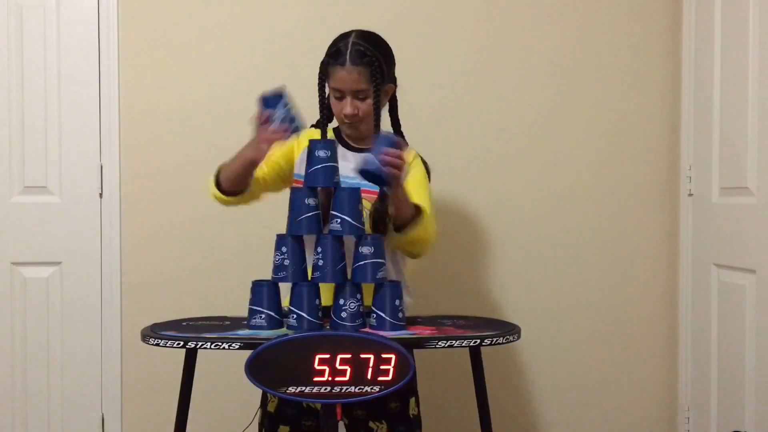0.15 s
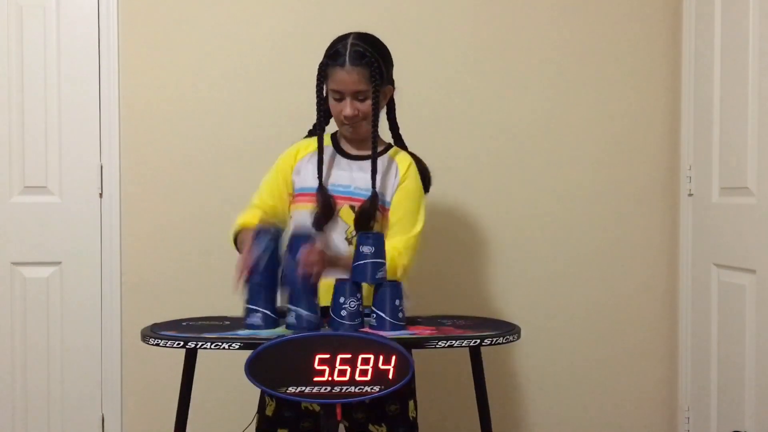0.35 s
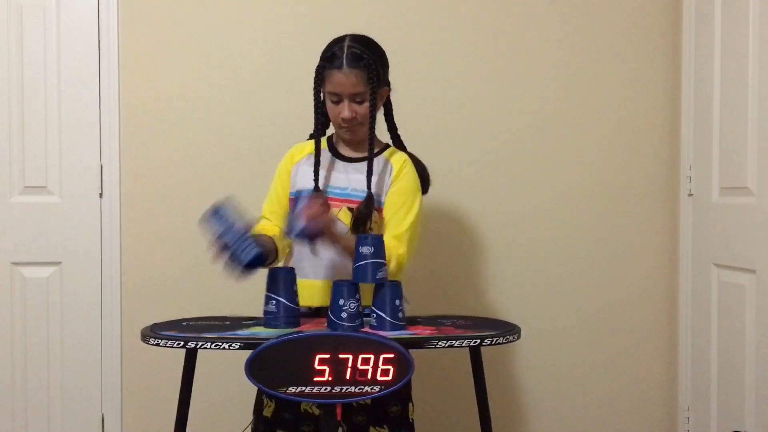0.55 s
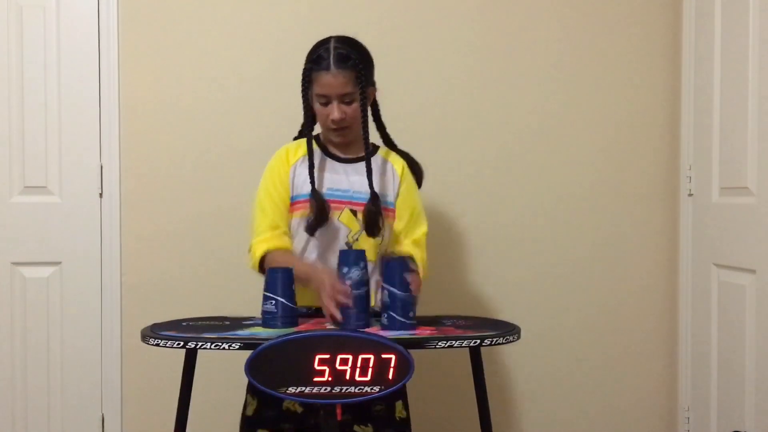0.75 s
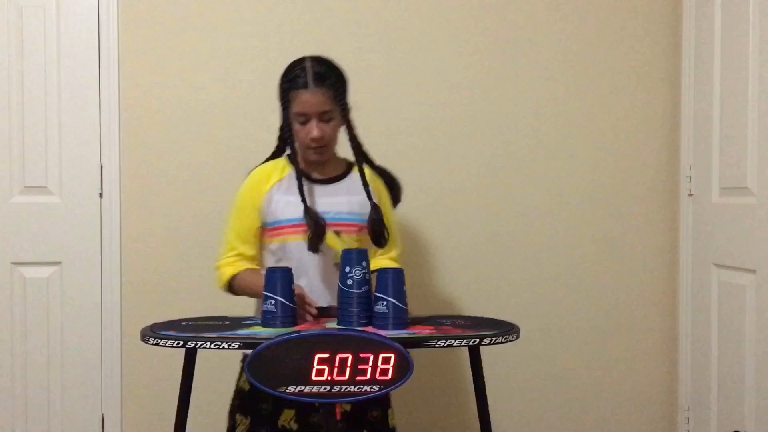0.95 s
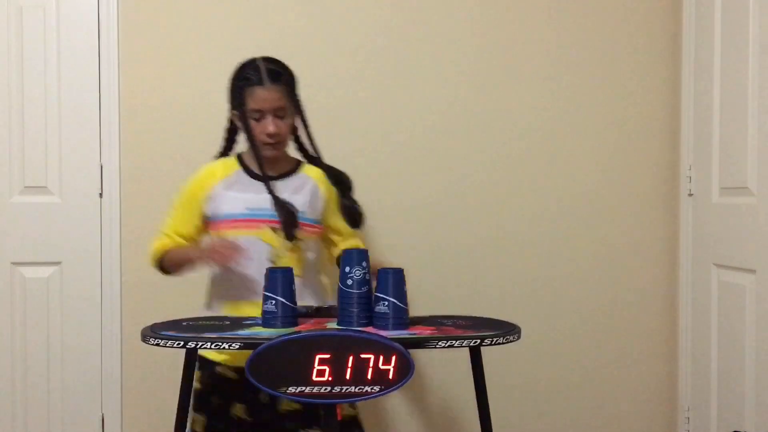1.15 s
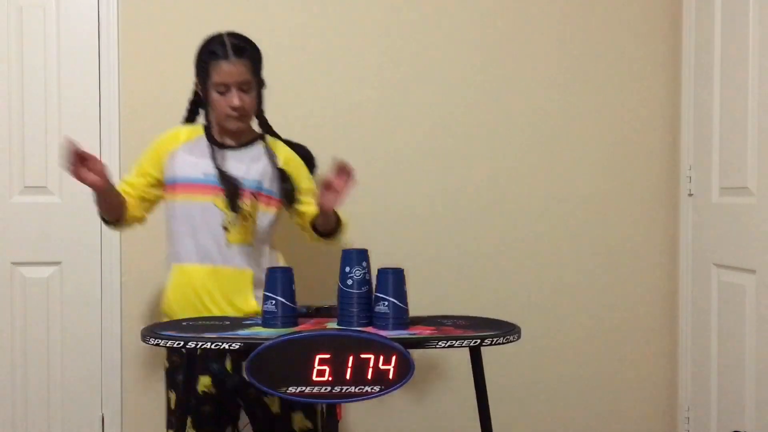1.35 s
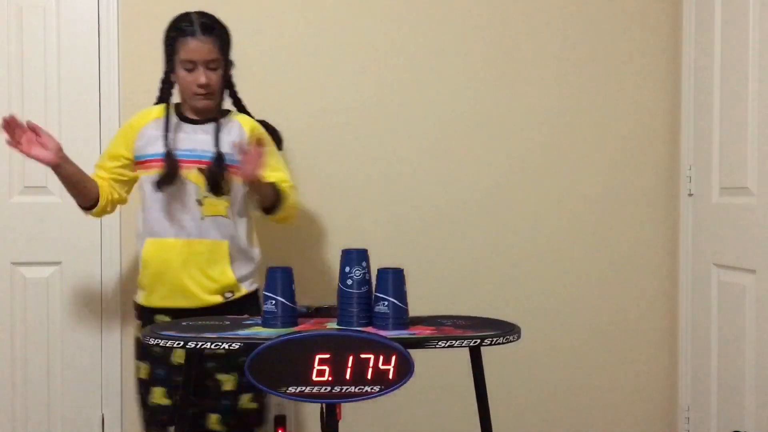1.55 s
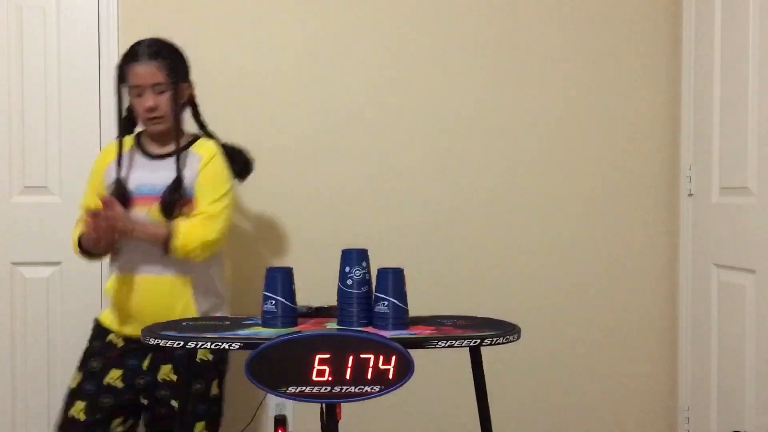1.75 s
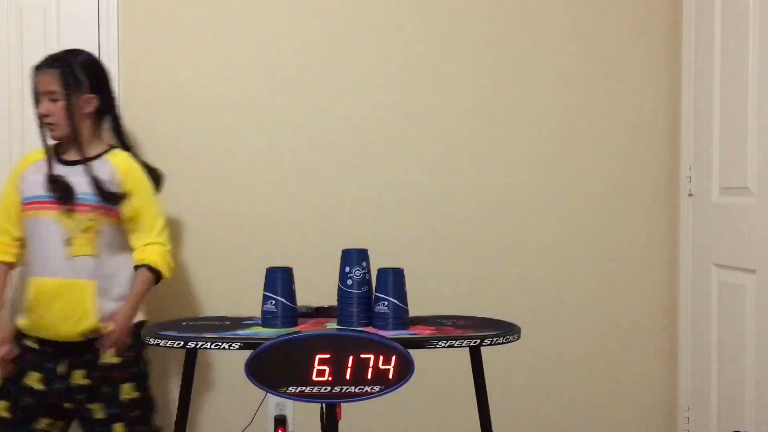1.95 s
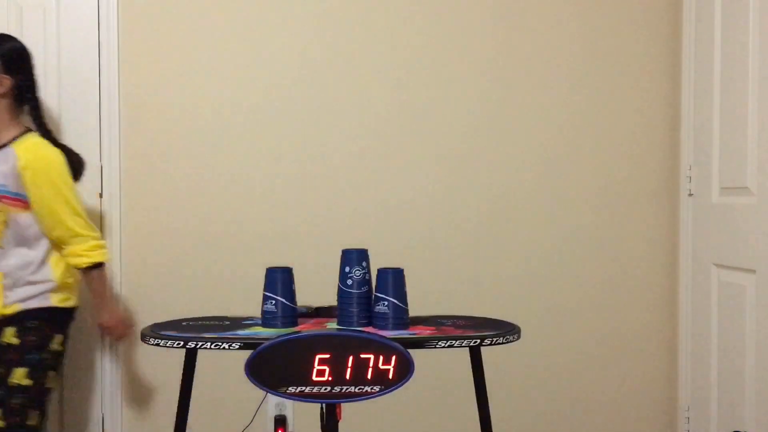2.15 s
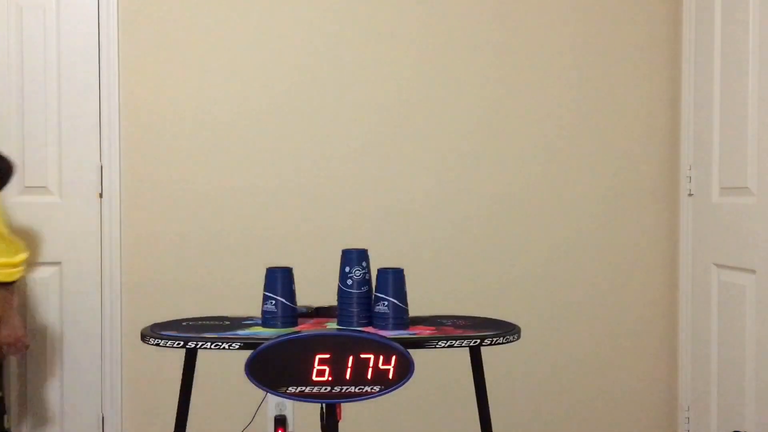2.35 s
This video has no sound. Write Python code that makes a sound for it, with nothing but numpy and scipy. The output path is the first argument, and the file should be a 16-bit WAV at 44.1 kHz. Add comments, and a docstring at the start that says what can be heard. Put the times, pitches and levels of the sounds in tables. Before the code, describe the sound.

Rapid hollow clatter of plastic cups being nested on a table, followed by a single clap.

```python
"""A bare, echoing room: plastic stacking cups are swept into nested piles on a small table.
An earlier flurry is still dying away as two fast flurries follow. Each contact is a rim click,
a hollow cup knock and a table thud; nesting cups scrape and pop, and full piles boom on the table.
Afterwards clothes rustle and the hands clap once; faint ticks sit in the room's hush."""
import sys
import numpy as np
from scipy import signal
from scipy.fft import rfft, irfft
from scipy.io import wavfile

SR = 44100
rng = np.random.default_rng(int(sys.argv[2]) if len(sys.argv) > 2 else 0)


def generate_wav(sig):
    """Save sig (samples, or channels by samples) to the path in sys.argv[1] as 16-bit PCM at SR."""
    pcm = np.round(np.clip(np.atleast_2d(sig).T, -1, 1) * 32767).astype(np.int16)
    wavfile.write(sys.argv[1], SR, pcm)


N = 105840


def amp(db):
    """dB to gain."""
    return 10 ** (np.asarray(db) / 20)


def along(points, hz):
    """Interpolate a table on a log frequency axis."""
    freqs, values = np.transpose(points)
    return np.interp(np.log(hz + 1), np.log(freqs + 1), values)


def fade(t, t60):
    """Exponential decay, 60 dB per t60."""
    return np.exp(-np.log(1000) * t / t60)


def norm(x):
    """Scale to unit energy."""
    return x / np.sqrt(np.sum(x ** 2) + 1e-20)


def add(out, start_s, db, x, window_s=0.01):
    """Mix in x; db is the level of unit energy spread over window_s."""
    i = int(round(start_s * SR))
    x = x[:N - i]
    out[i:i + len(x)] += amp(db) * np.sqrt(window_s * SR) * x


def colour(spectrum, size=2048):
    """Minimum-phase impulse response of a spectrum, unit energy."""
    gain = amp(along(spectrum, np.fft.rfftfreq(size, 1 / SR)))
    cepstrum = irfft(np.log(gain))
    cepstrum[1:size // 2] *= 2
    cepstrum[size // 2 + 1:] = 0
    return norm(irfft(np.exp(rfft(cepstrum))))


def noise(spectrum):
    """Coloured noise, unit rms."""
    return norm(signal.fftconvolve(rng.standard_normal(N), colour(spectrum))[:N]) * np.sqrt(N)


def lowpass(x, cutoff_hz, order=60):
    """Steep zero-phase low-pass."""
    hz = np.fft.rfftfreq(2 * N, 1 / SR)
    return irfft(rfft(x, 2 * N) / (1 + (hz / cutoff_hz) ** (2 * order)))[:N]


def ring(modes, attack_s=0.0022):
    """Struck modes as decaying sines, unit energy."""
    t = np.arange(SR) / SR
    sines = sum(amp(db) * np.sin(2 * np.pi * hz * t) * fade(t, t60) for hz, db, t60 in modes)
    return norm(sines * (1 - np.exp(-t / attack_s)))


# Room decay (frequency [Hz], T60 [s])
ROOM_DECAY = [(100, 0.61), (350, 0.53), (1000, 0.47), (2700, 0.59), (5500, 0.53), (8000, 0.41),
              (12000, 0.37)]

def room_tail(decay=ROOM_DECAY, wall_s=0.0019):
    """Diffuse tail building up off the walls; T60 varies with frequency."""
    hz, t, bands = signal.stft(rng.standard_normal(SR), SR, nperseg=256)
    bands = bands * fade(t, along(decay, hz)[:, None])
    tail = signal.istft(bands, SR, nperseg=256)[1][:SR]
    onset = np.clip(np.arange(SR) / SR / wall_s - 0.5, 0, 1)
    return norm(tail * onset)


def blow(body, t60, wet_db, decay=ROOM_DECAY):
    """Contact noise burst plus room tail, filtered by the struck body."""
    out = signal.fftconvolve(amp(wet_db) * room_tail(decay), body)
    burst = rng.standard_normal(SR // 10) * fade(np.arange(SR // 10) / SR, t60)
    direct = norm(signal.fftconvolve(burst, body))
    out[:len(direct)] += direct
    return out


# Room noise and tick spectra (frequency [Hz], level [dB])
HUSH_SPECTRUM = [(15, -48), (25, -17.5), (49, 4), (142, -7.5), (224, -6.5), (515, -22.5), (588, -18.5),
                 (4870, -30.5), (6370, -28.5), (15000, -42.5)]
TICK_SPECTRUM = [(3000, -30), (5500, -20), (6500, 10), (7500, -10), (9500, 0), (11000, -25)]

def hush(ticks=6, first_s=2.101, gap_s=0.05):
    """Low room noise with a run of faint, even ticks."""
    out = amp(-65.5) * noise(HUSH_SPECTRUM)
    for k in range(ticks):
        add(out, first_s + k * gap_s, db=-74.5, x=colour(TICK_SPECTRUM))
    return out


# Sleeve spectrum (frequency [Hz], level [dB])
CLOTH_SPECTRUM = [(60, -10.5), (150, -17.5), (400, -12), (750, -8), (1450, -0.5), (2000, -9.5),
                  (2500, -16.5), (3500, -12), (7000, -25), (15000, -36)]
# Rustle envelope (time [s], level [dB])
CLOTH_ENVELOPE = [(1.575, -75), (1.603, -52.5), (1.65, -57.5), (1.69, -57.5), (1.75, -59), (1.85, -69)]

def cloth():
    """Sleeves rustle as the arms swing together."""
    times_s, levels_db = np.transpose(CLOTH_ENVELOPE)
    envelope_db = np.interp(np.arange(N) / SR, times_s, levels_db, left=-120, right=-120)
    return noise(CLOTH_SPECTRUM) * amp(envelope_db)


# Hollow ring spectrum (frequency [Hz], level [dB])
DYING_SPECTRUM = [(35, -40), (70, -19.5), (175, -7.5), (280, -19), (370, -6), (540, -14), (736, 0),
                  (900, -14.5), (1150, -16.5), (1400, -29.5), (1690, -28.5), (2100, -19.5), (2950, -30),
                  (3240, -22.5), (5000, -31), (11000, -47)]

def dying_flurry(start_db=-45.5, fall_db_per_s=44.5):
    """The ring of an earlier flurry fades out."""
    return noise(DYING_SPECTRUM) * amp(start_db - fall_db_per_s * np.arange(N) / SR)


# Swelled tail spectrum (frequency [Hz], level [dB])
SWELLED_TAIL_SPECTRUM = [(100, -20), (250, -14.5), (400, -4.5), (600, -0.5), (900, 1.5), (1200, 0),
                         (1550, -6), (2200, -0.5), (3500, -5), (5500, -12), (8000, -23)]

def swelled_tail(clatter, gain_db=-25.5, rise_s=0.14, cut_at_s=1.56):
    """The clatter's echo is held up as the recorder's gain recovers, then cuts off abruptly."""
    t = np.arange(N) / SR
    rise = 1 - np.exp(-t / rise_s)
    tail = norm(noise(SWELLED_TAIL_SPECTRUM) * fade(t, t60=1.36) * rise)
    cut = fade(np.maximum(t - cut_at_s, 0), t60=0.1)
    return amp(gain_db) * cut * signal.fftconvolve(clatter, tail)[:N]


# Palm and wall reflection spectra (frequency [Hz], level [dB])
PALM_SPECTRUM = [(30, -52), (200, -13.5), (500, -8.5), (1000, -4), (1600, -6.5), (2400, 1), (3000, -2),
                 (3900, 3.5), (5200, -8), (8000, -13.5), (10500, -20), (15000, -17.5)]
WALL_SPECTRUM = [(100, -18), (400, -13), (2000, -7.5), (2800, -16), (3300, 0), (4300, -3), (5100, -15.5),
                 (7500, -20.5), (11000, -35)]
# Clap tail decay (frequency [Hz], T60 [s])
CLAP_DECAY = [(150, 0.39), (1000, 0.24), (2800, .36), (4000, 0.33), (5200, 0.21), (8000, .35),
              (14000, 0.24)]

def clap(start_s=1.7632, level_db=-23, slap_delay_s=0.0042):
    """One sharp hand clap, its slap off the near wall and the room's bright ring."""
    out = np.zeros(N)
    palms = blow(colour(PALM_SPECTRUM), t60=0.0079, wet_db=3, decay=CLAP_DECAY)
    wall_ring = norm(noise(WALL_SPECTRUM) * fade(np.arange(N) / SR, t60=0.78))
    add(out, start_s, level_db, palms)
    add(out, start_s + slap_delay_s, level_db - 5.5, colour(WALL_SPECTRUM))
    add(out, start_s, level_db - 4.5, wall_ring)
    return out


# Nesting slides (start [s], end [s], relative level per catch [dB])
CUP_SLIDES = [(0.256, 0.326, -28.5), (.33, 0.443, -27.5), (0.695, 0.748, -28), (0.743, 0.826, -26.5)]
# Rib catch spectrum (frequency [Hz], level [dB])
RIB_SPECTRUM = [(150, -35.5), (700, -10.5), (1600, 0), (2200, 0.5), (3500, -1.5), (5500, -5), (8000, -7.5),
                (11000, -14.5)]

def scrape(catches_per_s=420, spread_db=2.5, wet_db=-4.5):
    """Ribs of sliding cups catch in a dense, uneven run of tiny clicks."""
    out, catch = np.zeros(N), colour(RIB_SPECTRUM)
    for start_s, end_s, db in CUP_SLIDES:
        for time_s in np.arange(start_s, end_s, 1 / catches_per_s):
            jitter, strength = rng.standard_normal(2)
            add(out, time_s + 0.5 * jitter / catches_per_s, db + spread_db * strength, catch)
    reverb = signal.fftconvolve(out, room_tail())[:N]
    return (out + amp(wet_db) * reverb) / (1 + amp(wet_db))


# Air pops (time [s], pitch [Hz], relative level [dB], T60 [s])
AIR_POPS = [(.243, 787, -16, 0.19), (.3155, 1101, -11, .14), (.3165, 521.5, -13.5, .2),
            (.36, 862, -16, 0.18), (.371, 781, -17, .22), (.7285, 1071, -9.5, 0.15),
            (.7305, 703.5, -10, 0.21), (.735, 1480, -15.5, 0.095), (.7725, 786, -15, 0.4),
            (.8088, 1150, -13.5, 0.47)]

def pops():
    """The air in a cup rings as it drops over another."""
    out = np.zeros(N)
    for time_s, hz, db, t60 in AIR_POPS:
        add(out, time_s, db, ring([(hz, 0, t60)]))
    return out


# Landings (time [s], relative boom [dB], ring pitch [Hz], relative ring [dB], ring T60 [s])
PILE_LANDINGS = [(0.351, -37, 375, -17, 0.29), (.44, -15, 236, -14, 0.66), (.7745, -13, 316.3, -6.5, 0.37),
                 (0.808, -15, 239.5, -14.5, 0.32)]
# Table boom spectrum (frequency [Hz], level [dB])
BOOM_SPECTRUM = [(20, -44), (50, -17.5), (80, -8), (125, -0.5), (175, -1), (260, -6), (500, -29.5),
                 (3000, -61)]

def landings():
    """Each full pile booms on the table top and rings at its own pitch."""
    out, boom = np.zeros(N), colour(BOOM_SPECTRUM, size=4096)
    for time_s, boom_db, hz, ring_db, t60 in PILE_LANDINGS:
        add(out, time_s, boom_db, blow(boom, t60=0.067, wet_db=-5))
        add(out, time_s, ring_db, ring([(hz, 0, t60)]))
    return out


# Contacts (time [s], relative click [dB], relative knock [dB], relative thud [dB])
CUP_CONTACTS = [(0.225, -25.5, -28.5, -26.5), (0.2331, -36, -31.5, -31), (.243, -25, -22, -33),
                (.249, -24.5, -22, -29.5), (0.2617, -26, -23.5, -25), (0.271, -26, -23, -24),
                (.2847, -25, -24.5, -26.5), (0.3005, -27, -24.5, -25), (0.3154, -17.5, -14.5, -21),
                (0.3203, -22.5, -11.5, -18), (.3265, -22, -15, -18), (0.3448, -21, -20.5, -14),
                (0.3596, -15.5, -14, -11), (0.37, -19.5, -12.5, -16), (.378, -17.5, -16, -15),
                (0.3836, -19.5, -14, -16), (.411, -27.5, -20.5, -17.5), (0.4226, -27.5, -19, -17.5),
                (.431, -17, -15.5, -16.5), (0.4391, -17.5, -19, -16), (.447, -25.5, -15, -13.5),
                (0.4749, -31, -24, -23.5), (0.6945, -27.5, -36.5, -39.5), (0.709, -21, -26.5, -37),
                (.7285, -24, -14, -34), (.7337, -23, -13.5, -31), (.749, -17, -16.5, -25.5),
                (0.7553, -16.5, -15, -16.5), (0.7727, -14.5, -10.5, -12), (.784, -21, -14, -11),
                (.793, -21, -16.5, -15), (0.8093, -15, -13, -12), (.818, -20.5, -19, -18),
                (0.8249, -21.5, -23, -18)]
# Rim click, cup knock and table thud spectra (frequency [Hz], level [dB])
CLICK_SPECTRUM = [(50, -42), (200, -25.5), (900, -1), (2100, 1), (2800, -0.5), (3600, 1), (5000, -4),
                  (6200, -8), (7500, -8.5), (11000, -19.5)]
KNOCK_SPECTRUM = [(50, -45), (150, -28.5), (450, -8), (730, -0.5), (900, 0), (1150, 0.5), (1600, -7.5),
                  (2100, -6), (3500, -19), (9000, -33.5)]
THUD_SPECTRUM = [(20, -49.5), (60, -30), (120, -17), (240, -13.5), (360, 1.5), (480, -0.5), (650, -11.5),
                 (1500, -33), (6000, -49.5)]
# Cup and table modes (frequency [Hz], level [dB], T60 [s])
CUP_MODES = [(726, -3, .25), (804, -5.5, 0.38), (866, 0.5, .3), (961, -3.5, .25), (1095, -2.5, 0.39),
             (1168, -0.5, 0.47), (1377, 3.5, 0.19), (2004, -1, 0.58)]
TABLE_MODES = [(190, -14, .3), (236, -10.5, .35), (314, -5, .3), (367.7, 0, 0.21), (394.9, 3.5, .25),
               (438.3, -4, 0.35), (512, -4, 0.15), (568, -2.5, .22)]

def cup_contacts():
    """Each contact clicks, knocks and thuds, and sets cups and table ringing."""
    out = np.zeros(N)
    click, knock, thud = colour(CLICK_SPECTRUM), colour(KNOCK_SPECTRUM), colour(THUD_SPECTRUM)
    cup_ring, table_ring = ring(CUP_MODES), ring(TABLE_MODES)
    for time_s, click_db, knock_db, thud_db in CUP_CONTACTS:
        add(out, time_s, click_db, blow(click, t60=0.013, wet_db=0.5))
        add(out, time_s, knock_db, blow(knock, t60=0.033, wet_db=1))
        add(out, time_s, thud_db, blow(thud, t60=0.052, wet_db=1))
        add(out, time_s, knock_db - 6.5, cup_ring)
        add(out, time_s, thud_db - 3, table_ring)
    return out


def scene():
    """Mono mix of cups, clap, sleeves and room."""
    clatter = amp(-5.5) * (cup_contacts() + pops() + scrape() + landings())
    cups = lowpass(clatter + swelled_tail(clatter) + dying_flurry(), cutoff_hz=11250)
    return (cups + clap() + cloth() + hush())[None]


def record(dry):
    """20 Hz low cut, soft peak clipping, band limit."""
    x = signal.sosfilt(signal.butter(2, 20, "high", fs=SR, output="sos"), dry[0])
    x = x / (1 + np.abs(x) ** 8) ** (1 / 8)
    return lowpass(x, cutoff_hz=15900)[None]


dry = scene()
out = record(dry)
generate_wav(out)
```